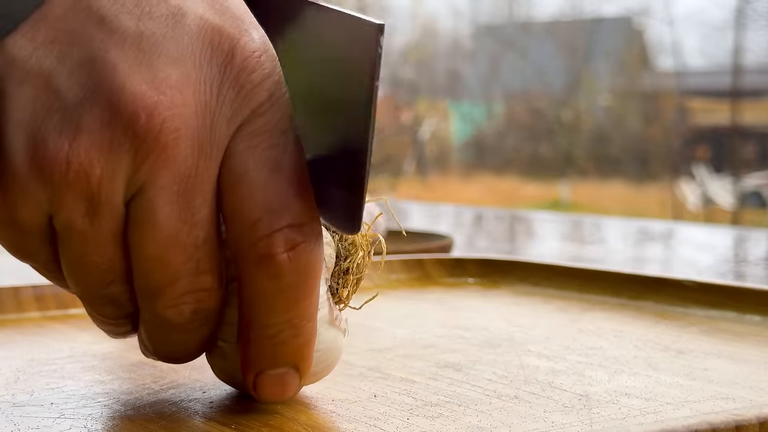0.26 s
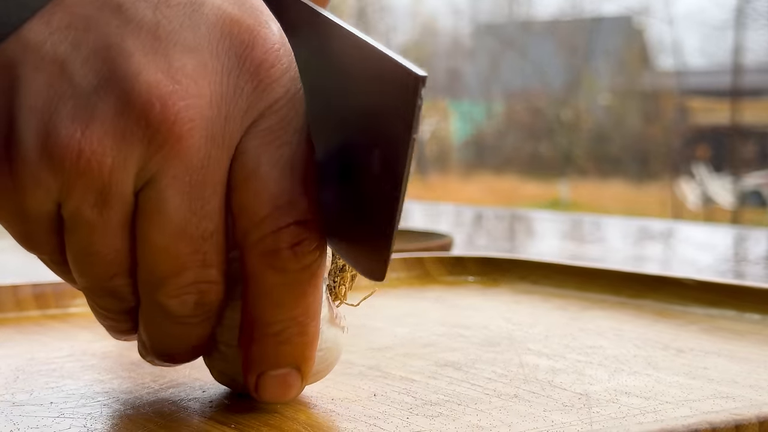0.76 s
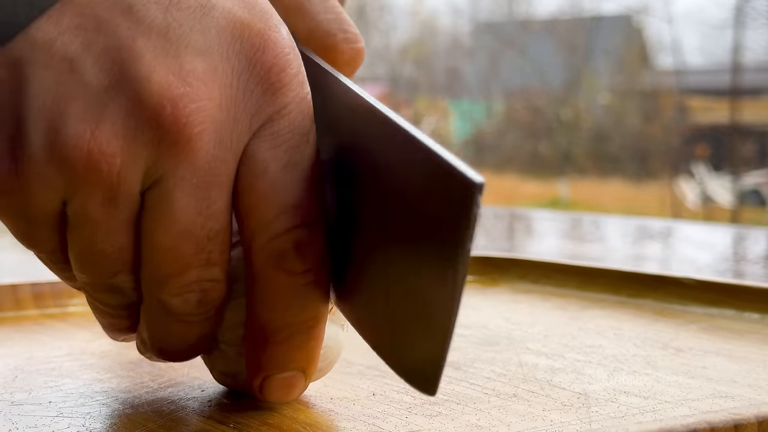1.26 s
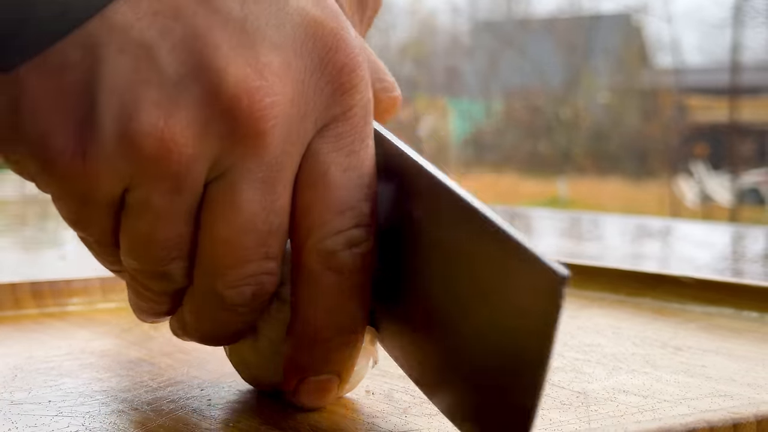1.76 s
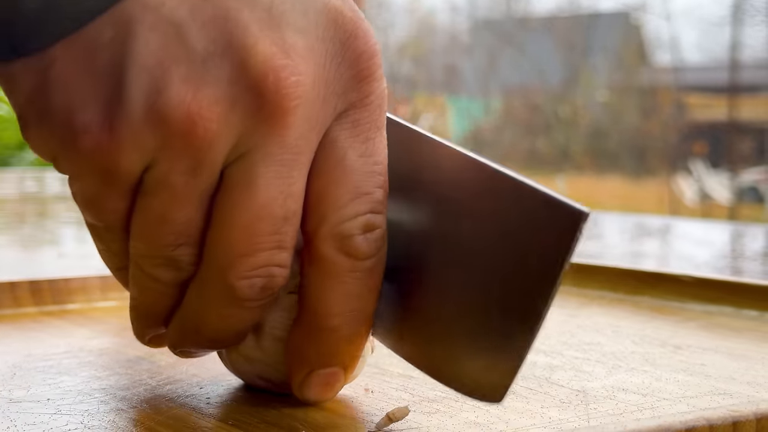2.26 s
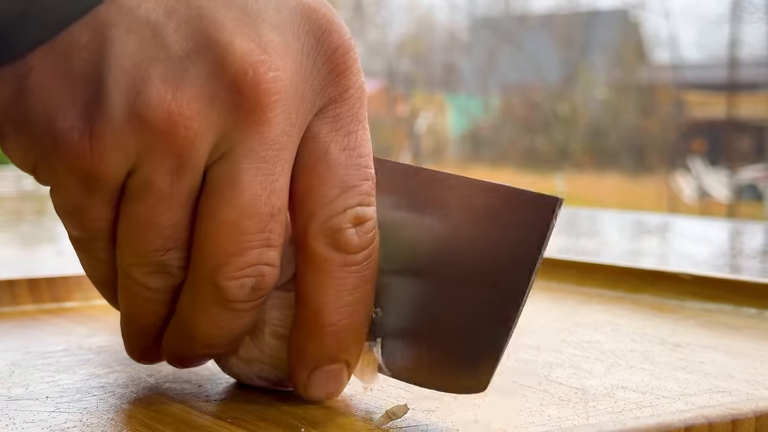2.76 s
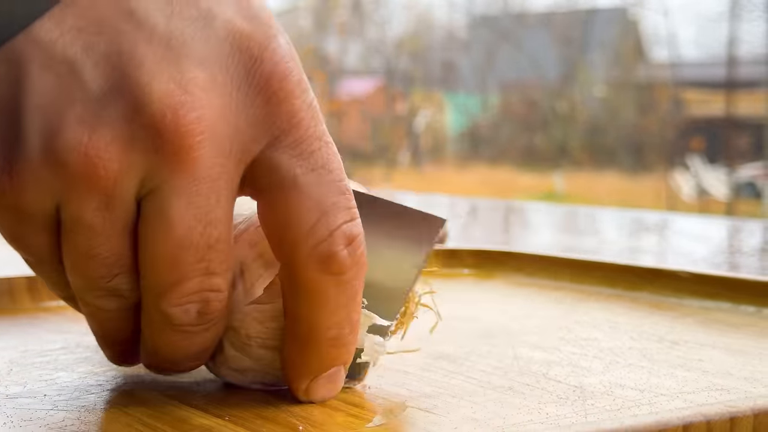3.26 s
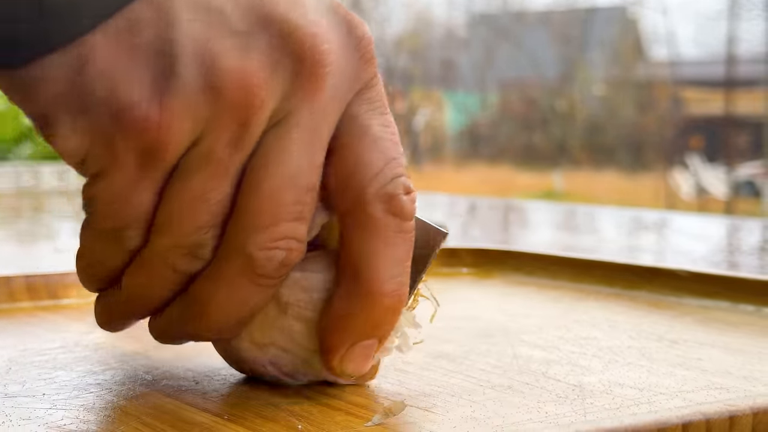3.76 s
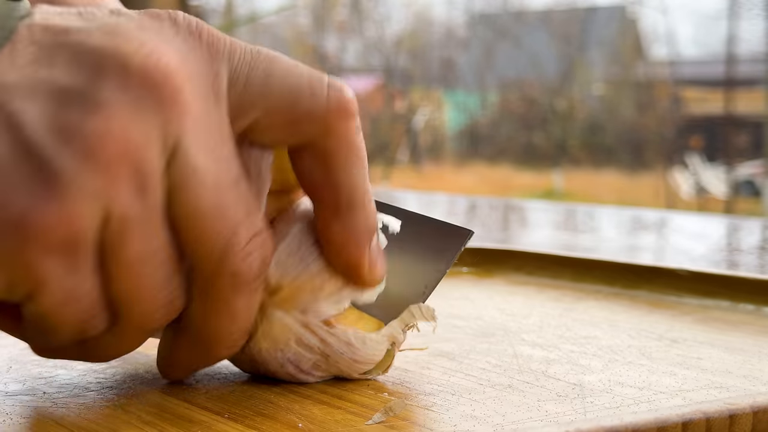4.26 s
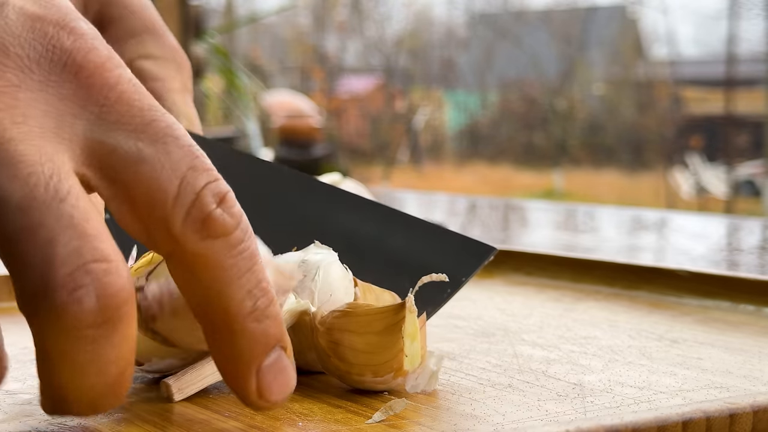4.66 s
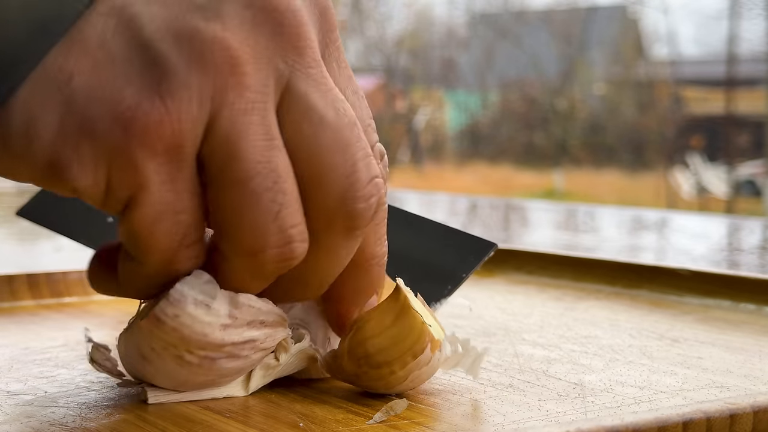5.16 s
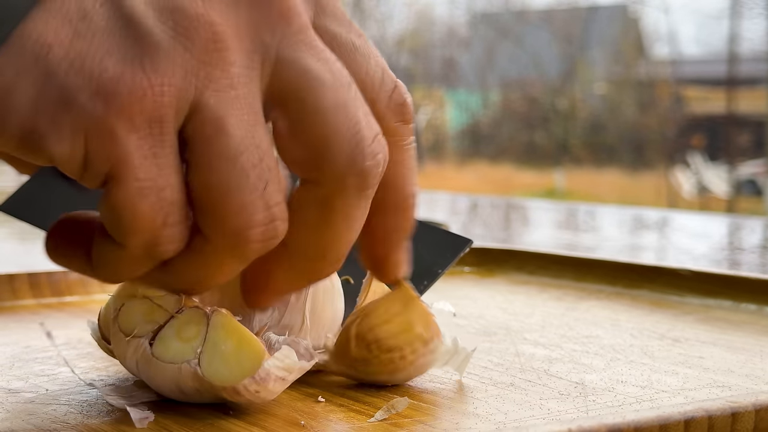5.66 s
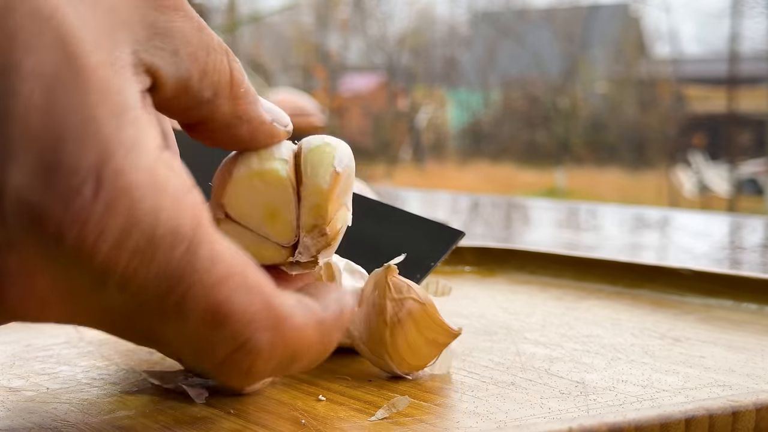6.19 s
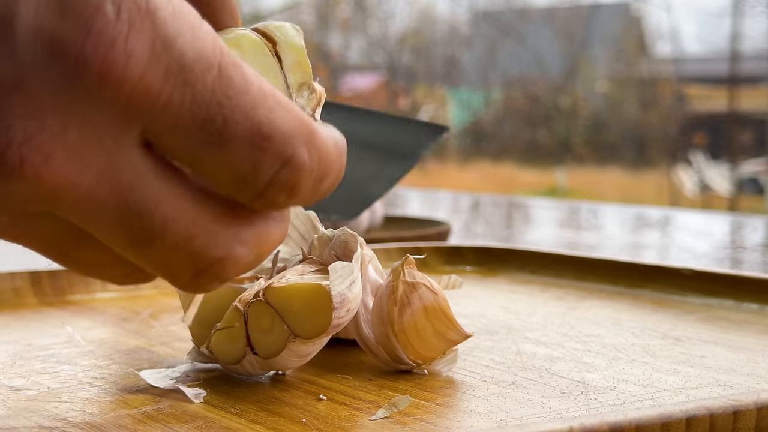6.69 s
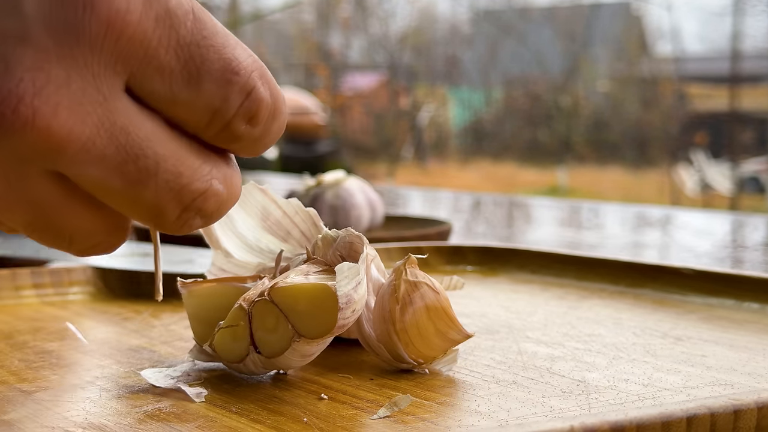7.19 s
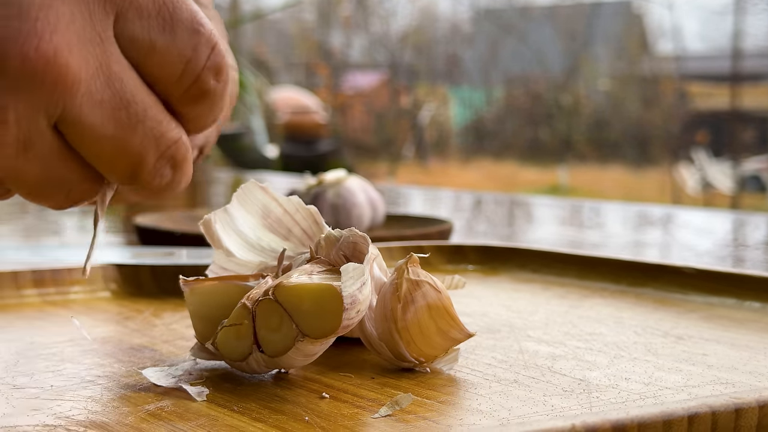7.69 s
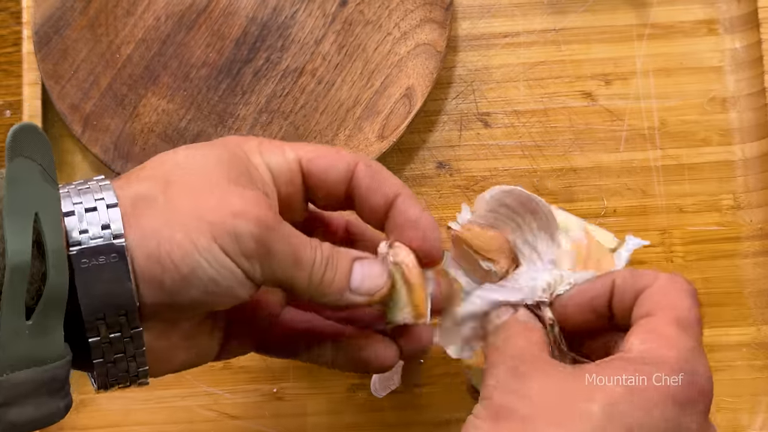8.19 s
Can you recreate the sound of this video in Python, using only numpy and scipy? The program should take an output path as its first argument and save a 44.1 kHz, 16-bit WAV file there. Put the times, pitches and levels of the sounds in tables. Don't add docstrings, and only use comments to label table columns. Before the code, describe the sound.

Dry garlic skins snap and rustle as a heavy blade jerks through to a wooden board with hard knocks, then peeling crackle and cloves bouncing in a wooden bowl.

```python
import sys
import numpy as np
from scipy import signal
from scipy.fft import rfft, irfft, next_fast_len
from scipy.io import wavfile
from scipy.ndimage import uniform_filter1d, map_coordinates

SR = 44100
rng = np.random.default_rng(int(sys.argv[2]) if len(sys.argv) > 2 else 0)


def ratio(d):
    e = np.asarray(d, float) / 20
    return 10 ** e


def master_out(mix):
    frames = np.transpose(np.atleast_2d(mix))
    ceiling = np.clip(frames, -1, 1)
    pcm = np.round(ceiling * 32767).astype(np.int16)
    wavfile.write(sys.argv[1], SR, pcm)


N = 372204

# frequency in Hz, level in dB per Hz
AIR_SPECTRUM = [(30, 4.5), (100, 5.5), (200, 3), (400, -7.5), (1000, -3), (2500, -12.5), (5500, -21),
                (9000, -30), (15000, -29)]
# frequency in Hz, likeness from 0 to 1
AIR_LIKENESS = [(60, 1), (300, 1), (700, 0.2), (1400, .1), (2300, 1), (8000, 1)]
AIR_DB = -62

# time in seconds, groan level in dB
HAND_WEIGHT = [(0, -61.5), (.9, -63.5), (1.9, -52), (2.2, -54), (3.0, -54.5), (3.3, -56), (3.8, -50),
               (4.4, -61), (5.4, -59.5), (6.9, -62), (8.44, -61.5)]
WEIGHT_THUMP_DB, WEIGHT_CREAK_DB = 0.9, -2.5
# start in seconds, hold in seconds, groan level in dB,
# table thump in dB over the groan, creak in dB over the groan
SHOVES = [(0.79, 0.068, -47.5, -10, -14), (1.012, 0.14, -32, -15, -15), (1.596, .01, -38, 1.5, -7),
          (1.726, 0.025, -34, 4, 4.5), (2.232, 0.075, -36.5, -27, -8), (2.415, 0.012, -26.5, -12, -2),
          (2.818, 0.0092, -27, -17, -6), (3.002, 0.018, -41.5, 1, -20), (4.048, 0.026, -44, 1.5, -8.5),
          (4.324, .01, -51, 6, -9), (7.02, 0.0072, -34.5, -17, -28), (7.232, .01, -40, 2, -12),
          (4.895, 0.11, -62, -8, 3), (7.638, 0.03, -55, 10, -1), (8.346, 0.023, -45, 1.5, -19)]
SHOVE_RISE, GROAN_FALL, THUMP_FALL, CREAK_FALL = 620, 430, 104, 640
# frequency in Hz, level in dB per Hz
CREAK_SPECTRUM = [(88, -25), (150, 5), (249, 1), (554, -8.5), (609, -5.5), (1490, -21.5), (2500, -19),
                  (3250, -22), (5500, -120)]

# strike times in seconds, pitch in Hz,
# level in dB, decay by 60 dB in seconds
BLADE_RING = ([7.012, 7.235], 2680, -47, .3)
# start in seconds, peak in dB, pitch in Hz, 60 dB decay in seconds
SOFT_TAPS = [
    (.3805, -35.5, 640, 0.029),
    (1.7135, -11.5, 107, .14),
    (4.286, -31.5, 990, 0.018),
    (7.397, -54, 2060, .1),
    (7.394, -56, 1650, .07),
    (7.41, -55, 2000, 0.051),
]

# start in seconds, peak in dB, hardness in dB per octave
BOARD_KNOCKS = [(1.046, -27.5, 1), (1.109, -31.5, -3.5), (1.709, -17.5, 3), (2.24, -33.5, -2),
                (2.4115, -4.5, 3.5), (2.8032, -4.5, 3), (2.977, -27, 2.5), (3.477, -41, -8.5),
                (4.565, -32.5, -5.5), (4.626, -39.5, -3), (2.4245, -17, -1.5), (2.815, -18, -2.5),
                (1.916, -34.5, 1), (1.668, -30, 1), (2.36, -32, 1.5)]
# frequency in Hz, level in dB, 60 dB decay in seconds
BOARD_MODES = [(200.2, -18, 0.17), (258, -12, 0.16), (409, -0.5, 0.087), (495, -12.5, .15),
               (619, -1.5, 0.078), (731, -13.5, .12), (937, -4, 0.05), (1144, -6, .06), (1255, -5.5, 0.025),
               (1413, -17, .06)]
# frequency in Hz, level in dB per Hz
BOARD_BODY = [(60, -74), (150, -11), (600, -1), (1200, -7), (3000, -13.5), (6000, -40), (12000, -56)]
# frequency in Hz, 60 dB decay in seconds
BOARD_DECAY = [(150, 0.2), (500, 0.1), (1200, 0.045), (3000, 0.0051)]
# start in seconds, peak in dB, hardness in dB per octave
SLAB_SETS = [
    (8.077, -23.5, 1.5),
    (8.312, -24.5, -0.5),
    (8.335, -24, -2),
    (8.422, -36.5, -1.5),
]
# frequency in Hz, level in dB, 60 dB decay in seconds
SLAB_MODES = [(215, -19, .12), (382, 0, .1), (554, -9, .12), (851, -10.5, .08), (1150, -14, 0.064),
              (1730, -17, .05)]
# start in seconds, peak in dB, hardness in dB per octave
BOWL_DROPS = [
    (7.0075, -19, 0.5),
    (7.017, -20, -1.5),
    (7.197, -21.5, -2.5),
    (7.2345, -8, 1.5),
    (7.06, -32, -8),
    (7.1875, -19.5, -1),
    (7.229, -6, 3.5),
    (7.261, -18.5, -1.5),
]
# frequency in Hz, level in dB, 60 dB decay in seconds
BOWL_MODES = [(259, -16, .16), (401, 2.5, 0.074), (453, 0, 0.11), (619.6, 0.5, 0.093), (817, 1, 0.08),
              (889, 0, .11), (1117, -4.5, 0.1), (1428, -7, 0.1), (1704, -5.5, 0.07), (1950, -14, .09),
              (2207, -5, 0.075), (2590, -5.5, .07), (2860, -10, .07), (3100, -15, 0.083)]
# frequency in Hz, level in dB per Hz
BOWL_BODY = [(60, -29.5), (200, -7), (800, -7.5), (1900, -11), (3000, -10.5), (6000, -27), (9000, -39),
             (12500, -58), (14500, -46)]
# frequency in Hz, 60 dB decay in seconds
BOWL_DECAY = [(150, 0.15), (500, 0.09), (1500, 0.06), (6000, 0.069)]

# frequency in Hz, level in dB per Hz
PAPER_SPECTRUM = [(290, -42), (500, -8), (961, -4), (1560, -8), (2080, -1), (2960, 5), (4410, -3),
                  (7780, -0.5), (9000, -14.5), (11700, -24), (19800, -120)]
# frequency in Hz, level in dB per Hz
SHEEN_SPECTRUM = [(6000, -16.5), (8000, -12), (9000, -2.5), (15000, -5)]
# start in seconds, hold in seconds, rustle in dB,
# sheen in dB over the rustle
JERKS = [(1.036, .03, -44, 14.5), (1.09, 0.072, -47, 12.5), (1.66, 0.027, -42, 6), (2.29, 0.028, -50, 5),
         (4.077, .008, -37, -2), (5.763, .05, -48.5, 3), (6.197, .03, -51, 3), (8.136, 0.03, -41.5, 4.5),
         (1.55, 0.035, -44.5, 5), (1.61, 0.11, -45.5, 10.5), (1.71, 0.039, -30, -6),
         (1.825, 0.069, -45.5, 1), (1.92, 0.046, -44, 4.5), (2.226, 0.048, -44.5, 11),
         (2.33, 0.085, -42.5, 7.5), (2.39, 0.072, -33.5, 2), (2.55, 0.029, -36, -6), (2.6, 0.11, -51, 11),
         (2.787, 0.014, -38, 9), (2.83, 0.047, -40, 5.5), (3.5, 0.195, -41.5, -7), (3.74, 0.012, -28.5, -1),
         (3.8, 0.0096, -31.5, 3.5), (3.868, 0.066, -39.5, -4.5), (3.95, 0.15, -43, -7),
         (5.103, 0.052, -36, 1.5), (5.245, 0.0067, -43, 2), (5.3, 0.082, -43, 0.5), (7.85, 0.08, -53, 11),
         (7.988, 0.039, -48.5, 6), (8.06, 0.12, -46.5, 6.5), (8.295, 0.045, -47, 7.5)]
JERK_RISE, JERK_FALL = 1520, 580
# start in seconds, hold in seconds, rustle in dB,
# sheen in dB over the rustle
FINGERS = [(.88, 0.021, -64.5, 9), (1.35, 0.16, -63.5, 16.5), (2.1, 0.094, -58, 5), (2.89, 0.069, -48, -6),
           (3.13, 0.058, -45.5, 0.5), (4.22, 0.095, -46.5, 4), (4.35, 0.056, -50.5, 3),
           (4.5, 0.066, -45.5, 1.5), (4.7, 0.092, -58, -2), (4.9, 0.084, -51, 3), (5.07, 0.018, -46, 1),
           (5.2, 0.016, -46.5, -4), (5.45, 0.093, -55, 1), (5.69, 0.15, -58, 8), (5.83, 0.22, -41.5, 3.5),
           (6.27, 0.053, -49.5, -3.5), (3.255, 0.023, -52.5, 3), (3.44, .02, -54, 0.5), (2.52, .02, -58, 3),
           (2.76, .015, -52, 0.5), (4.14, .03, -56, 3), (7.6, 0.15, -65.5, 5), (8.24, 0.015, -55, 9),
           (8.38, 0.067, -54, 3)]
FINGER_RISE, FINGER_FALL = 151, 210
REST_DB, REST_SHEEN_DB = -67.5, 4
# start in seconds,
# peak in dB, pitch in Hz, length in ms
SKIN_SNAPS = [(0.9852, -25, 7740, 3.2), (1.0344, -13, 7740, 1.1), (1.4424, -32, 6900, 1.7),
              (1.5547, -12.5, 2620, 2), (1.5875, -28, 6700, 1.4), (1.6119, -10.5, 8350, 1.13),
              (1.6269, -22, 6660, 1.4), (1.6456, -15, 6200, 2.9), (1.6784, -10, 4100, 1.6),
              (1.6888, -4.5, 3570, 3.4), (1.7085, -4, 3920, 2.1), (1.7459, -1, 5100, 1.97),
              (2.058, -28.5, 3000, 4.9), (1.9178, -9, 6400, 1.54), (2.0877, -27, 4260, 6.7),
              (2.2307, -19, 3200, 1.2), (2.2668, -25, 5200, 1.7), (2.3191, -13, 4200, 2.2),
              (2.3834, -13, 7000, 0.8), (2.4012, -2, 4670, 0.77), (2.48, -16, 5060, 3.1),
              (2.5653, -11, 3300, 1.4), (2.7469, -23, 5360, 5.8), (2.8296, -17, 4300, 1.3),
              (2.904, -14, 3250, 2.9), (2.9319, -22, 2860, 10.4), (3.0588, -22, 6000, 2.3),
              (3.044, -18.5, 7200, 0.82), (3.304, -24, 3920, 1.5), (3.3365, -26, 4300, 3.3),
               (3.4038, -27, 3080, 2.1), (3.4367, -25.5, 3130, 2.9), (3.4657, -23, 2800, 2.6),
               (3.4777, -12, 2750, 3), (3.5904, -1.5, 5900, 1.6), (3.617, -8.5, 3700, 2.6),
               (3.6629, -4.5, 2270, 2.1), (3.7437, -7, 6000, 3.9), (3.748, -22, 4000, 2.7),
               (3.7608, -4.5, 5960, 3.2), (3.7825, -15, 3100, 1.2), (3.8024, -6.5, 5600, 8.9),
               (3.818, -10, 3300, 1.1), (3.8514, -6.5, 3080, 2.38), (3.8708, -10, 4700, 1.7),
               (3.88, -2, 3870, 0.98), (3.925, -13.5, 3860, 1.2), (3.9393, -6, 6000, 1.5),
               (4.0383, -9, 4670, 2), (4.058, -8.5, 5900, 1.8), (4.091, -14.5, 3500, 2.5),
               (4.1067, -14.5, 1510, 0.82), (4.2186, -23, 6500, 3.6), (4.2522, -22, 2440, 1.6),
              (5.1597, -14.5, 2800, 2.2), (5.2985, -9, 3350, 1.3), (5.3835, -29, 3400, 1),
              (5.5051, -27.5, 6000, 1.6), (6.0325, -13.5, 2770, 1.85), (6.0425, -20, 5370, 1.4),
              (6.8386, -33, 6660, 1.2), (7.8122, -28, 7600, 1.8), (7.854, -17.5, 8200, 0.8),
              (7.901, -7.5, 4600, 3.6), (8.1347, -17.5, 3740, 4.2),
              (.826, -30, 6500, 2.5), (.933, -31, 5200, 2), (2.5495, -20, 3770, 1.9),
             (.996, -27.5, 2800, 8.4), (4.524, -21, 2000, 0.76), (6.57, -44, 1490, 2.2),
             (6.64, -34.5, 2500, 2.1), (7.865, -24, 2800, 0.92), (7.901, -20, 840, 2.17),
             (8.161, -23, 1730, 4), (8.185, -25, 1500, 1.3), (8.194, -30.5, 1500, 2.3)]
# start in seconds, peak in dB, pitch in Hz
LESSER_CREASES = [(1.0449, -21.5, 6810), (1.0552, -23, 2190), (1.0884, -30, 8660), (1.0953, -25, 2580),
                  (1.1204, -24, 7320), (1.1304, -29, 7430), (1.1687, -29, 6920), (1.2859, -41, 8700),
                  (1.4909, -39, 7330), (1.6364, -25, 7100), (1.751, -13, 6140), (1.7998, -29, 3270),
                  (1.8739, -21, 3160), (1.946, -24.5, 4740), (2.2443, -22, 6830), (2.3264, -23, 7560),
                  (2.3469, -21, 6220), (2.358, -19, 7180), (2.502, -28, 7560), (2.8424, -23, 6430),
                  (2.8764, -23, 3040), (2.9626, -29, 6460), (3.014, -32.5, 2700),
                  (3.113, -32, 4890), (3.2525, -33, 6410), (3.2734, -34, 6220), (3.3414, -30.5, 6280),
                 (3.4934, -28, 2710), (3.508, -34, 3140), (3.5189, -28, 2830), (3.5299, -23.5, 2920),
                 (3.5488, -24, 3170), (3.6736, -22, 2510), (3.9659, -29, 3040), (3.9734, -30, 3100),
                 (3.9814, -30, 2400), (4.0028, -30, 3420), (4.076, -17.5, 3650), (4.1919, -30, 8890),
                 (4.2862, -29, 2720), (4.329, -30, 4690), (4.3515, -31, 2800), (4.4089, -32, 6310),
                 (4.4947, -28.5, 2850), (4.509, -26, 2980), (4.6639, -41, 2910), (4.6995, -42, 2790),
                  (5.0129, -35, 2420), (5.034, -34.5, 2590), (5.0528, -37, 2710), (5.0748, -27, 2870),
                (5.0927, -27, 2990), (5.1057, -20, 3360), (5.1272, -16.5, 3210), (5.1971, -27.5, 7660),
                (5.25, -26.5, 7540), (5.3163, -25, 2430), (5.3582, -24, 3610), (5.4569, -35, 4540),
                (5.5346, -40, 2930), (5.7613, -31, 6410), (5.7724, -29, 2170), (5.7977, -29, 2260),
                (5.8376, -25, 2490), (5.8441, -24.5, 2110), (5.8562, -23, 2890), (5.9102, -22, 3010),
                (5.9204, -26, 2980), (6.1948, -37, 2390), (6.2136, -31, 3250), (6.2711, -34, 2780),
                (6.2981, -37, 2970), (6.3369, -37, 2900), (7.6051, -45, 3990), (7.9364, -36, 2850),
                (7.9808, -34, 4790), (8.0037, -32, 6060), (8.023, -32, 2810), (8.2381, -36, 3170),
                  (1.549, -29, 7000), (1.6014, -26, 8800), (1.657, -25, 4550), (1.6644, -24, 7000),
                   (2.377, -20, 5500), (1.7125, -14, 6000), (2.3975, -15, 2700), (2.5366, -35, 2600),
                   (2.762, -30, 3100), (2.775, -33, 2800), (2.7845, -27, 5500), (3.260, -35, 7000),
                   (3.3216, -38, 3100), (3.4234, -37, 6100), (3.4584, -29, 2800), (3.7253, -27, 3800),
                   (3.7975, -18, 7500), (3.8296, -23, 2400), (3.9117, -25, 8000), (7.9174, -35, 3000),
                   (8.0644, -34, 4000)]
CREASE_MS = 2.2
# peak in dB, pitch in Hz, length in ms
BLADE_SLIP = (-16, 3700, 1.85)
CHATTER_S, CHATTER_PERIOD_S = 1.829, 0.0086
FLAKES_OVER_DB, FLAKE_HZ, FLAKE_MS = 10.5, 4600, 2.23

# frequency in Hz, lead in radians
PORT_LEAD = [(0, 0), (130, .3), (260, 1.25), (350, .8), (500, -.1), (1400, -.3), (1900, 0), (3400, .6),
             (5500, 0), (7060, -.55), (8100, 0), (8600, -.8), (9130, -2.2), (15800, -16)]
# frequency in Hz, left minus right in dB
PORT_LEAN = [(40, -1.5), (130, -4), (260, 0), (350, -2.5), (520, .5), (1000, .5), (2000, 0)]
# frequency in Hz, gain in dB
PORT_TOP = [(15500, 2), (15900, -25), (16100, -43), (17000, -42), (17500, -93)]


def unit(x):
    return x / np.sqrt(np.mean(x ** 2) + 1e-20)


def along(points, hz):
    f, value = np.transpose(points)
    return np.interp(np.log(hz + 1), np.log(f + 1), value)


def wobble(rate):
    knots = rng.standard_normal(int(N * rate / SR) + 4)
    return map_coordinates(knots, [np.arange(N) * rate / SR])


def filtered(x, response):
    m = next_fast_len(N + SR // 2)
    return irfft(rfft(x, m) * response(np.fft.rfftfreq(m, 1 / SR)), m)[..., :N]


def coloured(x, spectrum):
    return unit(filtered(x, lambda hz: ratio(along(spectrum, hz))))


def resonance(f, centre_hz, width_hz):
    return 1j * f * width_hz / (centre_hz ** 2 - f * f + 1j * f * width_hz)


def lay(times, rows):
    at = np.round(np.asarray(times) * SR).astype(int)[:, None] + np.arange(rows.shape[1])
    return np.bincount(at.ravel(), rows.ravel(), N + SR)[:N]


def strokes(start, hold, level_db, rise, fall):
    t = np.arange(0, N / SR + .01, .001)[:, None]
    before = np.maximum(start - t, 0)
    after = np.maximum(t - start - hold, 0)
    power = ratio(2 * (level_db - rise * before - fall * after)).sum(1)
    return np.interp(np.arange(N) / SR, t[:, 0], power)


def crackle(count, spread_db, life):
    moment, chance = rng.random((2, count))
    size_db = spread_db * np.minimum(-np.log(1 - chance), 4)
    kicks = np.bincount((moment * N).astype(int), ratio(2 * size_db), N)
    u = np.arange(SR // 40) / SR / life
    power = signal.fftconvolve(kicks, u * u * np.exp(-2 * u))[:N]
    return unit(np.sqrt(np.abs(power)) * rng.standard_normal(N))


def air():
    def mid_and_side(hz):
        turn = np.arccos(np.clip(along(AIR_LIKENESS, hz), -1, 1)) / 2
        return ratio(along(AIR_SPECTRUM, hz)) * np.array([np.cos(turn), np.sin(turn)])

    pair = rng.standard_normal((2, N)) * ratio(0.37 * wobble(rate=2.66))
    mid, side = filtered(pair, mid_and_side)
    return ratio(AIR_DB) * unit(np.array([mid + side, mid - side]))


def nearby(x):
    t = np.arange(SR // 8) / SR
    tail = rng.standard_normal((2, len(t))) * ratio(-60 * t / 0.039) * (t > .0015)
    wet = signal.fftconvolve(x[None], tail / np.linalg.norm(tail[0]), axes=1)[:, :N]
    return filtered(wet, lambda hz: 1 / (1 + 1j * hz / 2500) ** 2 + 0.19)


def pressed_board():
    weight_db = np.interp(np.arange(N) / SR, *np.transpose(HAND_WEIGHT))
    s, hold, groan_db, thump_db, creak_db = np.transpose(SHOVES)

    def push(over_db, rest_db, fall):
        shoved = strokes(s, hold, groan_db + over_db, SHOVE_RISE, fall)
        return np.sqrt(shoved + ratio(2 * (weight_db + rest_db)))

    def shaken(centre_hz, width_hz, apart):
        shake = rng.standard_normal(N) + apart * rng.standard_normal((2, N))
        return unit(filtered(shake, lambda f: resonance(f, centre_hz, width_hz) ** 2))

    thump = push(thump_db, WEIGHT_THUMP_DB, THUMP_FALL) * shaken(66, 30, apart=0.051)
    groan = push(0, 0, GROAN_FALL) * shaken(110, 52, apart=0.33)
    creak = coloured(crackle(count=2500, spread_db=2.0, life=0.0016), CREAK_SPECTRUM)
    creak = push(creak_db, WEIGHT_CREAK_DB, CREAK_FALL) * creak
    return ratio(-2.5) * thump + ratio(-4.5) * groan + ratio(2.0) * creak


def blade_ring():
    s, hz, db, t60 = BLADE_RING
    t = np.arange(SR // 4) / SR
    tone = ratio(db - 60 * t / t60) * np.sin(2 * np.pi * hz * t)
    return lay(s, np.tile(tone, (len(s), 1)))


def soft_taps():
    s, db, hz, t60 = np.transpose(SOFT_TAPS)[:, :, None]
    t = np.arange(SR // 4) / SR
    build = 1 - np.exp(-t * hz / .9)
    return lay(s[:, 0], ratio(db - 60 * t / t60) * np.sin(2 * np.pi * hz * t) * build)


def struck(events, modes, body, decay, blow, dense_db, hold, build):
    s, peak_db, hard_db = np.transpose(events)[:, :, None]
    t = np.arange(8192) / SR
    n = len(t)
    hz, frame_s, z = signal.stft(rng.standard_normal((len(s), n)), SR, nperseg=128, noverlap=112)
    fade = ratio(-60 * np.maximum(frame_s - hold, 0) / along(decay, hz)[:, None])
    thicket = signal.istft(z * fade, SR, nperseg=128, noverlap=112)[1][:, :n]
    thicket[:, 0] -= blow
    f = np.fft.rfftfreq(2 * n, 1 / SR)
    cepstrum = irfft(np.log(ratio(along(body, f) + hard_db * np.log2(f / 700 + 0.02))))
    cepstrum[:, 1:n] *= 2
    cepstrum[:, n + 1:] = 0
    rows = ratio(dense_db) * irfft(rfft(thicket, 2 * n) * np.exp(rfft(cepstrum)))[:, :n]
    for mode_hz, db, t60 in modes:
        level_db = db + hard_db * np.log2(mode_hz / 700) + rng.normal(0, 2.5, s.shape)
        turns = mode_hz * t + 0.38 * rng.standard_normal(s.shape)
        swell = 1 - np.exp(-t * mode_hz / build)
        rows = rows - ratio(level_db - 60 * t / t60) * np.sin(2 * np.pi * turns) * swell
    return lay(s[:, 0], ratio(peak_db) * rows / np.abs(rows).max(1, keepdims=True))


def board_knocks():
    return struck(BOARD_KNOCKS, BOARD_MODES, BOARD_BODY, BOARD_DECAY,
                  blow=12.2, dense_db=13, hold=0.00052, build=1.5)


def slab_sets():
    return struck(SLAB_SETS, SLAB_MODES, BOARD_BODY, BOARD_DECAY,
                  blow=7.4, dense_db=12, hold=0.0016, build=0.66)


def bowl_drops():
    return struck(BOWL_DROPS, BOWL_MODES, BOWL_BODY, BOWL_DECAY,
                  blow=1.8, dense_db=15, hold=0.0088, build=.7)


def handling():
    dull = ratio(2 * REST_DB)
    bright = ratio(2 * (REST_DB + REST_SHEEN_DB))
    for rows, rise, fall in (JERKS, JERK_RISE, JERK_FALL), (FINGERS, FINGER_RISE, FINGER_FALL):
        s, hold, db, sheen_db = np.transpose(rows)
        dull = dull + strokes(s, hold, db, rise, fall)
        bright = bright + strokes(s, hold, db + sheen_db, rise, fall)
    return 10 * np.log10(dull), 10 * np.log10(bright / dull)


def patchy(x, depth_db):
    z = signal.stft(x, nperseg=128)[2]
    field = uniform_filter1d(rng.standard_normal(z.shape), size=5, axis=0)
    field = uniform_filter1d(field, size=8, axis=1)
    return signal.istft(z * ratio(depth_db * unit(field)), nperseg=128)[1][:N]


def rustle(rustle_db, sheen_db):
    grainy = np.clip((rustle_db + 61.0) / 18, .15, .7)
    grains = grainy * crackle(count=6000, spread_db=4.5, life=0.00095)
    grains = grains + np.sqrt(1 - grainy ** 2) * rng.standard_normal(N)
    grains = grains / np.sqrt(np.abs(uniform_filter1d(grains ** 2, size=1800)))
    grains = patchy(grains, depth_db=3.0)
    paper = coloured(grains, PAPER_SPECTRUM)
    sheen = ratio(sheen_db) * coloured(grains, SHEEN_SPECTRUM)
    return ratio(rustle_db - 3.5) * (paper + sheen)


def flakes(rustle_db, count):
    at = (rng.random(count) * (N - 1)).astype(int)
    size, pitch, length = rng.standard_normal((3, count))
    peak_db = rustle_db[at] + FLAKES_OVER_DB + 1.1 * size
    return list(zip(at / SR, peak_db, FLAKE_HZ * np.exp(.35 * pitch), FLAKE_MS * np.exp(.5 * length)))


def chatter(count):
    db, hz, ms = BLADE_SLIP
    return [(CHATTER_S + k * CHATTER_PERIOD_S, db - 1.5 * (-1) ** k, hz, ms) for k in range(count)]


def ticks(rows, sheen_db, sharp):
    s, peak_db, pitch_hz, ms = np.array(rows, float).T[:, :, None]
    edge_db = sheen_db[(s * SR).astype(int)] + 7 * np.log2(pitch_hz / 4500) - 11.5
    rise_s = 0.0004 * np.clip(ms - .6, .3, 5)
    u = np.arange(1024) / SR / rise_s
    envelope = u * np.exp(1 - u) + 0.11 * np.exp(-u / 5) * (u > 1)
    burst = rng.standard_normal(u.shape) * envelope
    f = np.fft.rfftfreq(1024, 1 / SR)
    width_hz = pitch_hz / sharp * np.sqrt(pitch_hz / 4500)
    ring = resonance(f, pitch_hz, width_hz) * 1j * f / (1j * f + .45 * pitch_hz)
    edge = ratio(edge_db) * resonance(f, 9900, 12700) ** 2
    burst = irfft(rfft(burst) * (ring + edge))
    return lay(s[:, 0], ratio(peak_db - 4.0) * burst / np.abs(burst).max(1, keepdims=True))


def skins():
    rustle_db, sheen_db = handling()
    edge_db = np.clip(sheen_db, -8, 9)
    snaps = SKIN_SNAPS + chatter(count=6) + flakes(rustle_db, count=320)
    lesser = LESSER_CREASES
    creases = ticks([(*row, CREASE_MS) for row in lesser], edge_db, sharp=1.58)
    return rustle(rustle_db, sheen_db) + ratio(2.5) * creases + ticks(snaps, edge_db, sharp=1.0)


def scene():
    near = skins() + board_knocks() + slab_sets() + bowl_drops() + blade_ring() + soft_taps()
    return near + ratio(-8.5) * nearby(near) + pressed_board() + air()


def top_cut(x):
    return signal.sosfilt(signal.butter(12, 17150, fs=SR, output="sos"), x)


def record(dry):
    lead_hz, lead_rad = np.transpose(PORT_LEAD)
    half = np.array([[.5], [-.5]])

    def port_response(hz):
        phase = np.exp(1j * half * np.interp(hz, lead_hz, lead_rad))
        return phase * ratio(half * along(PORT_LEAN, hz) + along(PORT_TOP, hz))

    return top_cut(filtered(dry, port_response))


dry = scene()
out = record(dry)
master_out(out)
```